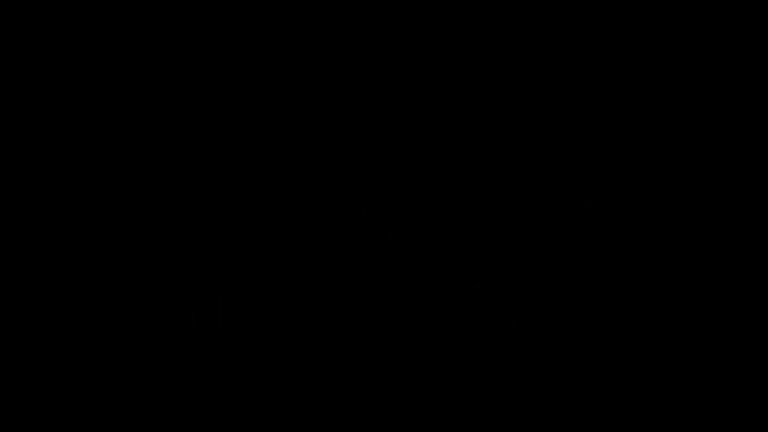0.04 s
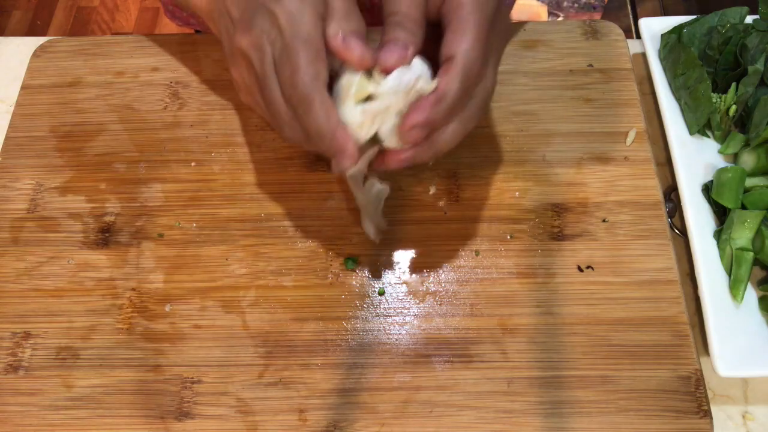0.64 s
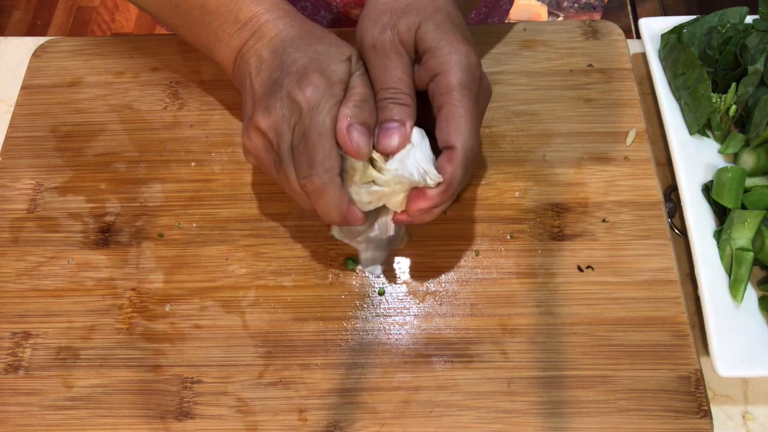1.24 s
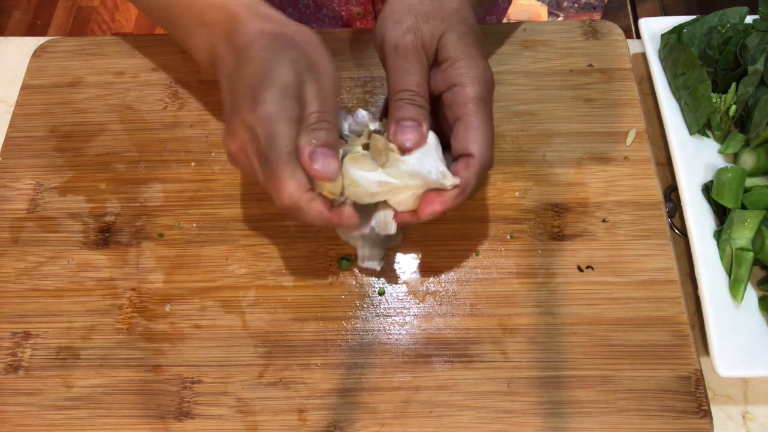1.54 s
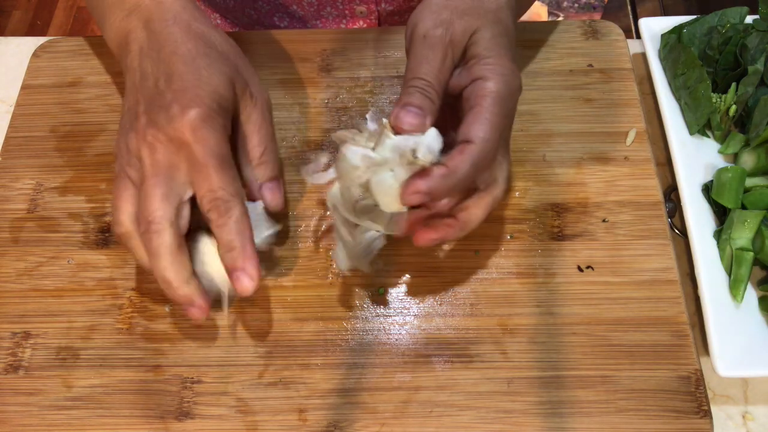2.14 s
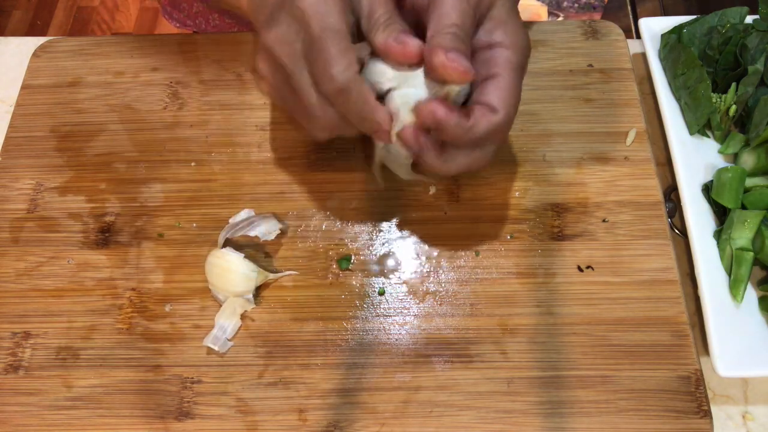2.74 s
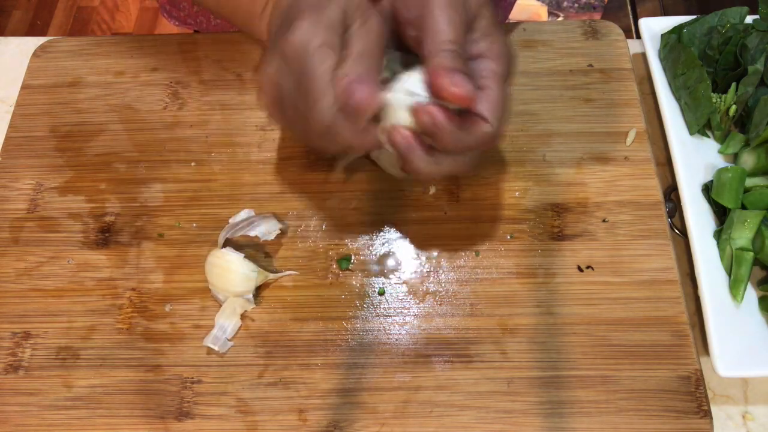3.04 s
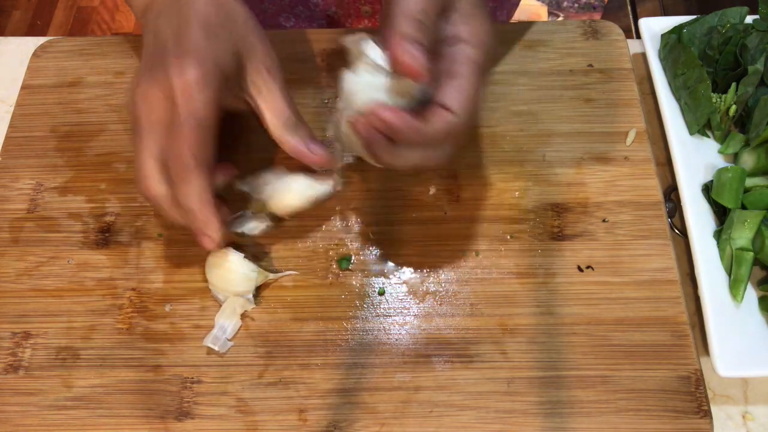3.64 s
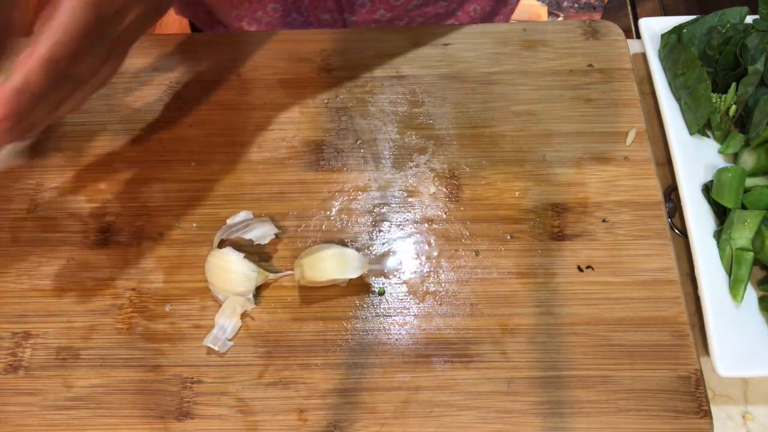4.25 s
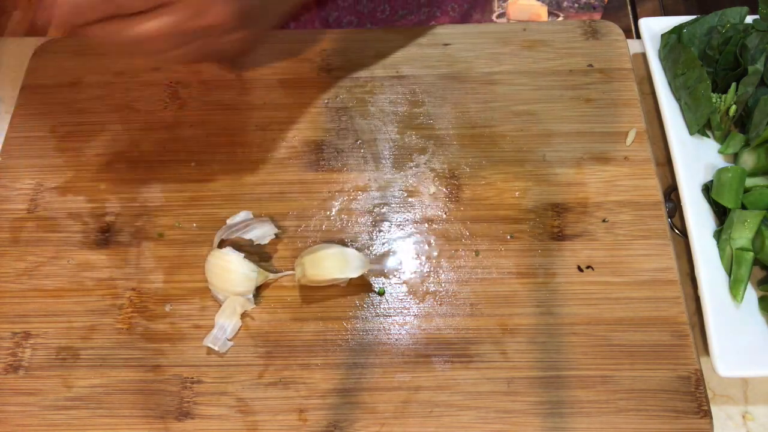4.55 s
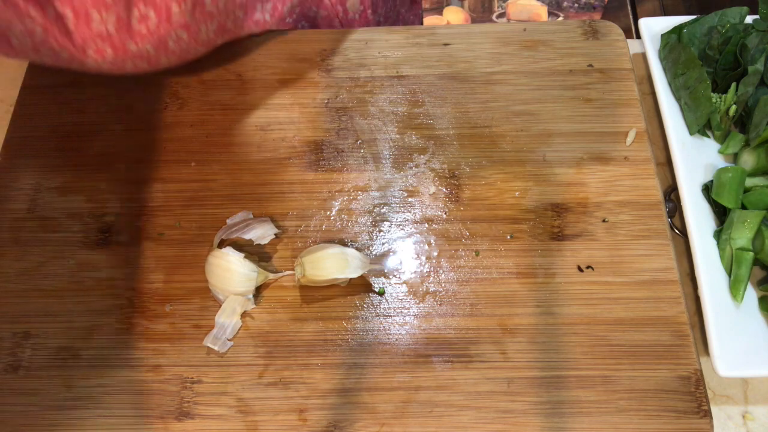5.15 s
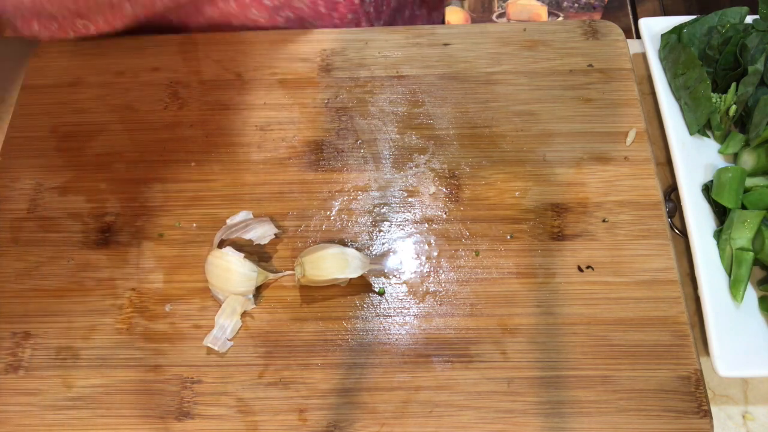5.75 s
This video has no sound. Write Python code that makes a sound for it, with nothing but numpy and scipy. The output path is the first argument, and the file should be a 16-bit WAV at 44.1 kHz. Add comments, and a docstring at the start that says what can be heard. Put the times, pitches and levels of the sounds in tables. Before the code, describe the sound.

Papery garlic skin crinkles and snaps under working fingers, heard up close in a still kitchen. One loud crack with a small pop frees a clove, followed by a short rip, a faint squeak and more crackling. A clove lands on a wooden cutting board with a few quick knocks. Last come a soft swish of cloth, two dull bumps on the counter and a slight scrape.

```python
"""Breaking a garlic bulb

Close up in a quiet kitchen, hands break garlic over a wooden board. The dry skins rustle with
countless tiny cracks, snap, tear and faintly squeak; a clove leaves the root with a hollow pop.
A loose clove drops and bounces on the board. Clothes brush past, then something bumps the
counter twice and slides a little."""
import sys
import numpy as np
from scipy import signal
from scipy.fft import rfft, irfft, next_fast_len
from scipy.io import wavfile
from scipy.ndimage import uniform_filter1d, map_coordinates

SR = 44100
rng = np.random.default_rng(int(sys.argv[2]) if len(sys.argv) > 2 else 0)


def generate_wav(signal):
    """Clip the signal to [-1, 1] and save it as 16-bit WAV at the path in sys.argv[1]."""
    frames = np.transpose(np.atleast_2d(signal))
    scaled = np.clip(frames, -1, 1) * 32767
    pcm = np.round(scaled).astype(np.int16)
    wavfile.write(sys.argv[1], SR, pcm)


N = 264379

# Levels are relative: each sound adds its own gain. A spectrum says how strong each frequency is.
# Finger pushes that crumple the skins: peak t/s, level/dB, rise/s, fall/s, treble vs level/dB
PUSHES = [(0.164, -44, 0.013, 0.066, -4), (.325, -47, 0.12, 0.047, -5), (.525, -49, .12, 0.065, -8),
          (.592, -41.5, 0.078, 0.054, -7.5), (.672, -46.5, 0.065, 0.08, -1), (.84, -54, 0.15, 0.27, -3),
          (.985, -48, 0.084, 0.18, -3.5), (1.125, -47.5, 0.21, 0.27, -9), (1.265, -52.5, .1, 0.088, -9),
          (1.338, -44, 0.024, 0.041, -6.5), (1.418, -34, 0.063, 0.047, -3), (1.58, -57.5, 0.16, 0.1, 0),
          (1.658, -56.5, 0.021, 0.069, -6.5), (1.78, -43, 0.15, 0.16, -6.5),
          (1.893, -34.5, 0.073, 0.087, -7.5), (1.958, -40.5, 0.032, 0.082, -1.5),
          (2.083, -41, 0.058, .09, -6), (2.254, -52.5, .03, 0.06, -4), (2.545, -49.5, 0.022, 0.041, -6),
          (2.595, -39.5, 0.065, 0.04, -1), (2.66, -44.5, 0.049, 0.033, -12), (2.721, -40, 0.053, 0.11, -6),
          (2.82, -42.5, 0.17, 0.1, -0.5), (2.9, -53, 0.067, 0.093, -3), (3.096, -34.5, 0.014, 0.073, 1),
          (3.34, -51, 0.098, 0.18, -3.5), (3.633, -56, 0.034, 0.068, -7), (3.74, -58.5, 0.16, 0.17, 1),
          (3.95, -43, 0.025, 0.047, -4.5), (4.062, -46.5, 0.034, 0.081, -1.5),
          (4.15, -49.5, 0.11, 0.11, -13.5), (4.264, -37, 0.065, 0.057, -4), (4.36, -52.5, 0.045, 0.052, -4)]
# Sleeves and apron brushing past: peak t/s, level/dB, rise/s, fall/s, treble vs level/dB
BRUSHES = [(4.81, -62, 0.22, 0.33, -5), (5.004, -57, 0.041, 0.052, -2), (5.1, -64, 0.12, 0.16, -2),
           (5.245, -60.5, 0.16, 0.18, -2.5), (5.4, -47, 0.0065, 0.063, 0.5),
           (5.478, -39, 0.011, 0.048, -4.5), (5.56, -51.5, 0.19, 0.13, -3.5), (5.644, -48, 0.072, 0.18, -7)]
# The whisper of the held bulb between pushes: t/s, level/dB
GRIP = [(.16, -64), (.39, -77.5), (.44, -56), (.75, -66), (1.55, -59), (2.15, -63.5), (2.35, -71),
        (3.0, -57.5), (3.25, -60), (3.55, -86), (4.0, -61.5), (4.5, -74.5), (5.99, -74)]
# How brittle the rustling stuff is, first dry skin, then soft cloth: t/s, brittleness/(0 to 1)
BRITTLENESS = [(3.9, 0.81), (4.72, 0.8), (4.98, 0.2)]
# Spectrum of a crumpling sheet of skin: f/Hz, level/dB
SKIN_SPECTRUM = [(300, -51), (900, -23.5), (1900, -7.5), (2700, -1), (3600, 2), (6300, -3), (8000, -7.5),
                 (10000, -11), (16000, -44.5)]
# Spectrum of the skin's brittle edges: f/Hz, level/dB
EDGE_SPECTRUM = [(3000, -41), (6500, 7), (8300, 2), (10300, 1), (12500, 6), (15500, 4.5), (16200, -17.5),
                 (17000, -39)]
# Spectrum of soft rubbing: f/Hz, level/dB
RUB_SPECTRUM = [(150, -32.5), (400, -9.5), (750, -5), (1000, 4), (1300, 6.5), (1800, 5.5), (2600, 5.5),
                (6000, -44)]
# Single snaps of the skin: t/s, level/dB, ringing f/Hz, treble vs level/dB
SNAPS = [(0.159, -33, 3450, -22), (0.595, -31.5, 7000, -10), (0.6393, -32.5, 3500, -2),
         (0.6585, -28, 3750, -13), (0.6696, -34.5, 4070, -2), (0.687, -33, 3400, -5),
         (0.7753, -39.5, 4200, -3.5), (0.823, -35, 3650, -12), (0.8787, -41, 5240, 0),
         (0.8976, -41.5, 4300, 6), (0.9556, -35.5, 4020, 0), (1.007, -36, 4270, -1),
         (1.1058, -30, 4500, -6), (1.1644, -24, 5040, -11), (1.1896, -27.5, 5040, -13),
         (1.2127, -30, 5460, -7), (1.2688, -34, 4800, 1.5), (1.333, -26, 3850, -8.5),
         (1.3448, -30, 4700, -6.5), (1.3742, -19.5, 5210, -12), (1.3831, -16, 5800, -4.5),
         (1.386, -21, 4780, 5), (1.3871, -18, 5700, 0.5), (1.3894, -23.5, 4580, -10),
         (1.4357, -29, 5320, 1.5), (1.5985, -35.5, 4100, 0), (1.6297, -32.5, 3800, -0.5),
         (1.6495, -33.5, 3800, -3), (1.8657, -28, 3670, 1), (2.074, -35, 3700, -2), (2.079, -36.5, 4900, 5),
         (2.2516, -36, 5100, -5), (2.2865, -32.5, 6240, -19), (2.349, -52.5, 6300, 5),
         (2.4356, -51, 7400, -5), (2.655, -40.5, 6660, 8.5), (2.8458, -31.5, 4800, -4),
         (2.894, -27, 3900, -7), (2.9432, -34, 5900, -6), (2.9548, -38, 5800, -10), (2.9886, -49, 6600, 8),
         (3.0913, -16, 5930, -9.5), (3.114, -23.5, 4650, -8), (3.1484, -27, 3840, -20),
         (3.2869, -39, 5330, -7), (3.3291, -34, 5700, -14), (3.3341, -31.5, 3500, -14),
         (3.4425, -48, 4600, -2), (3.537, -43, 4900, -2), (3.6726, -31.5, 5650, -5),
         (3.851, -40.5, 6500, 2.5), (4.0093, -36, 4260, -12), (4.6603, -49, 2520, -6.5),
         (4.7156, -44, 6700, -20), (4.7367, -50, 6940, -22), (4.766, -44.5, 6300, -14),
         (4.8738, -40.5, 6300, 0.5)]
# Spectrum of a snap, also used for the counter's rattle: f/Hz, level/dB
SNAP_SPECTRUM = [(150, -26), (700, -38.5), (1300, 4), (1900, -4.5), (3000, 6.5), (6500, 3.5), (8500, -3),
                 (12000, -20), (17000, -88.5)]
# A clove breaking from the root: t/s, pop level/dB, thud level/dB
ROOT_BREAKS = [(1.3853, -18, -44.5), (3.091, -38.5, -76)]
# Tones of the hollow between cloves and hands: f/Hz, level/dB, time to fade 60 dB/s
HOLLOW_TONES = [(1327, 0.5, 0.032), (1468, -7, 0.045), (1347, -21, 0.17)]
# The falling clove hitting the board: t/s, level/dB, knock f/Hz
BOUNCES = [(3.6731, -24, 970), (3.7277, -24.5, 1160), (3.7591, -34, 1230), (3.7798, -26.5, 1250),
           (3.7948, -43, 1300), (3.8203, -41, 1140)]
# Tones of the wooden board: f/Hz, level/dB, time to fade 60 dB/s
BOARD_TONES = [(375, -6, 0.16), (560, 6, 0.13), (900, 2, 0.09), (1090, 12, 0.069), (1345, 23.5, 0.019)]
# Strips of skin ripping: start t/s, length/s, level/dB, ringing f/Hz
TEARS = [(0.278, 0.079, -47, 3440), (0.595, 0.0046, -28, 6850), (0.628, 0.054, -55.5, 1230),
         (1.879, 0.034, -34.5, 2800)]
# Damp skin squeaking under the thumb: peak t/s, level/dB, rise/s, fall/s
SQUEAKS = [(2.441, -62, 0.27, 0.67)]
# Tones of the squeak at its peak: f/Hz, pitch blur/Hz, level/dB
SQUEAK_TONES = [(1070, 38, -2), (1706, 45, -7), (2090, 51, -2), (3030, 220, -1.5)]
# Bumps on the counter: t/s, level/dB
BUMPS = [(5.3936, -44), (5.4759, -46.5)]
# Tones of the counter: f/Hz, level/dB, time to fade 60 dB/s
COUNTER_TONES = [(87.5, -16, 0.64), (141.7, -10, 0.5), (193.3, -9, 0.24), (350, 11, 0.011), (610, -22.5, 1),
                 (1220, 5, 0.051)]
# Something sliding on the counter: t/s, scrape level/dB, drag level/dB
SLIDING = [(5.5, -80, -93), (5.7, -62, -101.5), (5.79, -67, -77), (5.83, -67.5, -61), (5.99, -71.5, -70)]
# Spectrum of the scrape: f/Hz, level/dB
SCRAPE_SPECTRUM = [(700, -28.5), (1050, -13.5), (1240, 1), (1450, -6), (3000, -38.5)]
# Spectrum of the low drag: f/Hz, level/dB
DRAG_SPECTRUM = [(150, -8), (300, -7), (390, -0.5), (480, 1.5), (600, -21.5), (950, -6), (2000, -41)]
# Nudges of hands and bulb: peak t/s, level/dB, rise/s, fall/s
NUDGES = [(1.06, -66, .35, .08), (3.9, -70, 0.38, .4), (4.4, -69, 0.067, 0.06), (4.6, -73, .12, 0.098)]
# Spectrum of the dull handling noise: f/Hz, level/dB
HANDS_SPECTRUM = [(40, -16.5), (110, 1), (280, -1), (450, -11), (700, -7.5), (1200, -53), (4000, -48)]
# How long the kitchen echoes: f/Hz, time to fade 60 dB/s
ECHO_TIMES = [(200, 0.2), (1500, 0.15), (6000, 0.16), (15000, 0.079)]
# Spectrum of the room's quiet air: f/Hz, level/dB
AIR_SPECTRUM = [(20, -27.5), (33, 9), (48, 8), (80, 6), (150, -17), (400, -7), (1000, -13), (3000, -20.5),
                (7000, -44.5), (16000, -93)]


def rustle(level_db, treble_db):
    """The same tiny cracks sound in the skin and at its edges. Cloth is smoother; light touches rub."""
    brittle = curves(BRITTLENESS)[0]
    grain = tiny_cracks(per_s=630, spread_db=9.5, fade_s=0.00093, smooth_share=1 - .5 * brittle)
    grain *= amp(1.67 * wobble(60))
    sheet = amp(level_db - 1.27) * grain * flake_noise(SKIN_SPECTRUM, patchy_db=3.0)
    edges = amp(treble_db) * grain * flake_noise(EDGE_SPECTRUM, patchy_db=3.5)
    rub_db = -8.5 - 0.29 * (level_db + 53)  # the louder the rustle, the smaller the share of rubbing
    rubbing = unit(colour(grain * rng.standard_normal(N), RUB_SPECTRUM))
    return sheet + edges + amp(level_db + rub_db - 2.7 * (1 - brittle)) * rubbing


def rustle_levels(grip_treble_db=-9):
    """Pushes and brushes add to the grip's whisper; gives the rustle's level and its treble in dB."""
    power = amp(curves(GRIP)[0]) ** 2
    treble = power * amp(grip_treble_db) ** 2
    for s, db, rise, fall, treble_db in PUSHES + BRUSHES:
        push = swell(s, db, rise, fall)
        power += push
        treble += push * amp(treble_db) ** 2
    return 10 * np.log10(power), 10 * np.log10(treble)


def tiny_cracks(per_s, spread_db, fade_s, smooth_share):
    """A jagged loudness curve: tiny cracks of very unequal size on top of smooth sliding."""
    sizes = amp(spread_db * np.minimum(rng.exponential(size=N), 3.4))
    cracks = (rng.random(N) < per_s / SR) * sizes ** 2
    power = signal.lfilter([1], [1, -np.exp(-1 / (fade_s * SR))], cracks)
    return np.sqrt(smooth_share + (1 - smooth_share) * power / power.mean())


def flake_noise(spectrum, patchy_db):
    """Noise whose tone keeps shifting as different flakes of skin take the strain."""
    bands = signal.stft(rng.standard_normal(N), nperseg=256)[2]
    patches = uniform_filter1d(rng.standard_normal(bands.shape), size=5, axis=0)  # smooth over pitch
    patches = uniform_filter1d(patches, size=9, axis=1)  # and over time
    patchy = signal.istft(bands * amp(patchy_db * unit(patches)))[1][:N]
    return unit(colour(patchy, spectrum))


def snaps():
    """A sudden crack, then splinters: they make a flake ring and set the skin shivering."""
    body, edge, flake = np.zeros((3, N))
    t = np.arange(SR // 25) / SR
    ms = SR // 1000
    sized = lambda x: x / np.sqrt(np.sum(x[:3 * ms] ** 2) / ms)  # same energy in the first 3 ms
    crack = 3 * (np.arange(len(t)) == ms // 2)
    splinters = amp(-60 * t / 0.0063) + amp(-13.5 - 60 * t / 0.021)
    for s, db, hz, treble_db in snap_clusters():
        flake_force, skin_force = crack + splinters * rng.standard_normal((2, len(t)))
        ringing = signal.lfilter(*signal.iirpeak(hz, 3.5, SR), flake_force)
        add(body, s, amp(db - 5.5) * sized(skin_force))
        add(edge, s, amp(db + treble_db) * sized(skin_force))
        add(flake, s, amp(db - 2.5) * sized(ringing))
    return colour(body, SNAP_SPECTRUM) + colour(edge, EDGE_SPECTRUM) + flake


def snap_clusters(mean_delay_s=.011):
    """SNAPS with extra rows: one fibre gives just before each snap, and two weaker cracks follow."""
    rows = list(SNAPS)
    for s, db, hz, treble_db in SNAPS:
        lead_s = 0.0032 * rng.uniform(.5, 1.2)
        rows.append((s - lead_s, db - 19, hz, treble_db))
        for delay in rng.exponential(mean_delay_s, 2):
            after_db = db - 14 + 2.5 * rng.standard_normal()
            after_hz = hz * np.exp(.2 * rng.standard_normal())
            rows.append((s + delay, after_db, after_hz, treble_db))
    return rows


def root_breaks():
    """The root gives way: the hollow between cloves and hands pops, and the hands jolt with a thud."""
    out = np.zeros(N)
    t = np.arange(SR // 5) / SR
    sinking_hz = 75 + 520 * np.exp(-t / 0.0073)
    thud = np.sin(2 * np.pi * np.cumsum(sinking_hz) / SR) * amp(-60 * t / 0.14)
    for s, pop_db, thud_db in ROOT_BREAKS:
        add(out, s, amp(pop_db) * ring(HOLLOW_TONES, attack_s=.002))
        add(out, s, amp(thud_db) * thud)
    return out


def falling_clove():
    """A firm, moist clove gives a very short knock at each bounce; the board rings faintly."""
    out = np.zeros(N)
    t = np.arange(SR // 20) / SR
    onset = (1 - np.exp(-t / 0.00086)) ** 2
    for s, db, hz in BOUNCES:
        knock = np.sin(2 * np.pi * hz * t) * onset * amp(-60 * t / 0.0043)
        add(out, s, amp(db + 15.5) * knock)
        add(out, s, amp(db - 32.5) * ring(BOARD_TONES, attack_s=0.0011))
    return out


def flake_ticks(level_db, count=560):
    """Tiny flakes flick free, each at its own pitch; they get louder with the rustle, up to a limit."""
    out = np.zeros(N)
    t = np.arange(SR // 100) / SR
    size = amp(np.clip(level_db, -68, -51) + 17) * curves(BRITTLENESS)[0]
    for sample, (pitch, strength) in zip(rng.integers(N, size=count), rng.standard_normal((count, 2))):
        hz = 5200 * np.exp(.35 * pitch)
        tone = np.sin(2 * np.pi * hz * t) + 0.32 * rng.standard_normal(len(t))
        tick = np.gradient(tone) * amp(-60 * t / 0.0029)  # taking the slope thins out the bass
        add(out, sample / SR, size[sample] * amp(2.5 * min(strength, 1.3)) * tick)
    return out


def tears(fibres_per_s=4000):
    """Fibres part in a quick run and keep a strip of skin ringing at its own pitch."""
    out = np.zeros(N)
    for s, length, db, hz in TEARS:
        arch = np.sin(np.linspace(0, np.pi, round(length * SR)))
        fibres = rng.standard_normal(len(arch)) * (rng.random(len(arch)) < fibres_per_s / SR)
        strip = signal.lfilter(*signal.iirpeak(hz, 5.5, SR), fibres)
        add(out, s, amp(db) * arch * unit(strip))
    return out


def squeak(climb_per_s=0.19):
    """Damp skin sticks and slips under the thumb, singing in a few rough, slowly rising tones."""
    out = np.zeros(N)
    for s, db, rise, fall in SQUEAKS:
        climb = 1 + climb_per_s * (np.arange(N) / SR - s)
        tones = np.zeros(N)
        for hz, blur_hz, tone_db in SQUEAK_TONES:
            flicker = amp(tone_db + 3.5 * wobble(70))
            phase = np.cumsum(2 * np.pi * hz * climb / SR) + drift(blur_hz, N)
            tones += flicker * np.sin(phase)
        out += np.sqrt(swell(s, db, rise, fall)) * unit(tones)
    return out


def counter():
    """Two dull bumps, each with a brief rattle, then a scrape that turns into a low drag."""
    out = np.zeros(N)
    t = np.arange(SR // 10) / SR
    for s, db in BUMPS:
        add(out, s, amp(db) * ring(COUNTER_TONES, attack_s=.0012))
        rattle = colour(rng.standard_normal(len(t)), SNAP_SPECTRUM)
        add(out, s, amp(-45 - 60 * t / 0.071) * rattle)
    scrape_db, drag_db = curves(SLIDING)
    scrape = amp(scrape_db) * noise(SCRAPE_SPECTRUM)
    drag = amp(drag_db) * noise(DRAG_SPECTRUM)
    is_sliding = np.arange(N) / SR > SLIDING[0][0]
    return out + is_sliding * (scrape + drag)


def hands():
    """Dull, uneven handling noise that swells with each nudge."""
    power = amp(-77) ** 2 + sum(swell(*nudge) for nudge in NUDGES)
    return np.sqrt(power) * amp(2.5 + 2.6 * wobble(32)) * noise(HANDS_SPECTRUM)


def kitchen_echo(x):
    """The room answers with a short echo whose treble dies first."""
    hz, t, bands = signal.stft(rng.standard_normal(SR // 2), SR, nperseg=256)
    tail = signal.istft(bands * amp(-60 * t / along(ECHO_TIMES, hz)[:, None]))[1]
    delayed = np.pad(tail, (SR // 250, 0))  # arrives 4 ms late
    return signal.fftconvolve(x, delayed / np.linalg.norm(tail))[:N]


def amp(db):
    """Turn decibels into a gain; amp(-60 * t / T) fades by 60 dB in T seconds."""
    return 10 ** (np.asarray(db) / 20)


def unit(x):
    """Scale to an average power of 1."""
    return x / np.sqrt(np.mean(x ** 2) + 1e-20)


def along(points, hz):
    """Read between (frequency, value) points on a logarithmic frequency scale."""
    f, values = np.transpose(points)
    return np.interp(np.log(hz + 1), np.log(f + 1), values)


def curves(rows):
    """Join a table's points in time: one curve for each column after the first."""
    s, *columns = np.transpose(rows)
    return [np.interp(np.arange(N) / SR, s, column) for column in columns]


def swell(s, db, rise, fall):
    """Power of one movement peaking at time s: up 20 dB over the rise, down 20 dB over the fall."""
    t = np.arange(N) / SR - s
    from_peak = np.maximum(-t / rise, t / fall)
    return amp(db - 20 * np.minimum(from_peak, 10)) ** 2


def wobble(per_s):
    """A smooth curve through per_s random points a second."""
    points = rng.standard_normal(int(N * per_s / SR) + 4)
    return map_coordinates(points, [np.arange(N) * per_s / SR])


def drift(blur_hz, samples):
    """A random wander of phase that blurs a tone's pitch."""
    return np.cumsum(rng.standard_normal(samples)) * np.sqrt(2 * np.pi * blur_hz / SR)


def ring(tones, attack_s, blur_hz=12):
    """One blow starts a set of fading tones; loose contacts blur each pitch a little."""
    t = np.arange(SR // 2) / SR
    out = np.zeros(len(t))
    for hz, db, fade_s in tones:
        out += amp(db - 60 * t / fade_s) * np.sin(2 * np.pi * hz * t + drift(blur_hz, len(t)))
    return out * (1 - np.exp(-t / attack_s))


def add(track, s, sound):
    """Mix a sound into the track at time s."""
    part = track[round(s * SR):][:len(sound)]
    part += sound[:len(part)]


def colour(x, spectrum, size=8192):
    """Filter a sound to give it the shape of a spectrum."""
    gains = amp(along(spectrum, np.fft.rfftfreq(size, 1 / SR)))
    cepstrum = irfft(np.log(gains))
    # Folding this onto its first half makes the filter ring only after a click, never before.
    cepstrum[1:size // 2] *= 2
    cepstrum[size // 2 + 1:] = 0
    response = irfft(np.exp(rfft(cepstrum)))
    return signal.fftconvolve(x, response / np.linalg.norm(response))[:len(x)]


def noise(spectrum):
    """Steady noise with the given spectrum and a power of 1."""
    return unit(colour(rng.standard_normal(N), spectrum))


def scene():
    """Garlic, counter and hands in the still air of the kitchen, on one channel."""
    level_db, treble_db = rustle_levels()
    skins = rustle(level_db, treble_db) + flake_ticks(level_db) + snaps() + tears() + squeak()
    near = skins + root_breaks() + falling_clove() + counter() + hands()
    echo = amp(-16.5) * kitchen_echo(near)
    air = amp(-73) * noise(AIR_SPECTRUM)
    return (near + echo + air)[None]


def record(dry):
    """After a moment of silence the sound starts; the microphone drops deep bass and the top treble."""
    start_s, bass_hz, top_hz = .153, 36.0, 16900
    live = dry * (np.arange(N) / SR > start_s)
    size = next_fast_len(N + SR // 2)
    hz = np.fft.rfftfreq(size, 1 / SR)
    bass_cut = hz ** 8 / (hz ** 8 + bass_hz ** 8)
    return irfft(rfft(live, size) * bass_cut * (hz < top_hz), size)[:, :N]


dry = scene()
out = record(dry)
generate_wav(out)
```